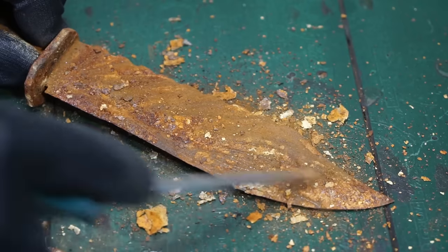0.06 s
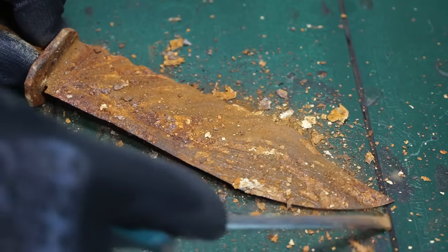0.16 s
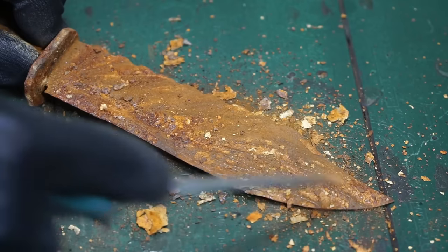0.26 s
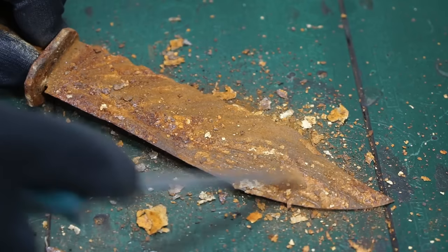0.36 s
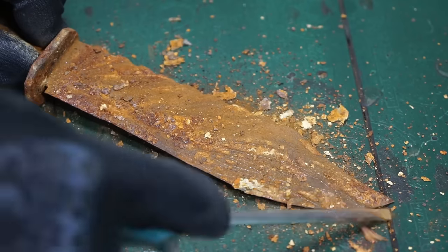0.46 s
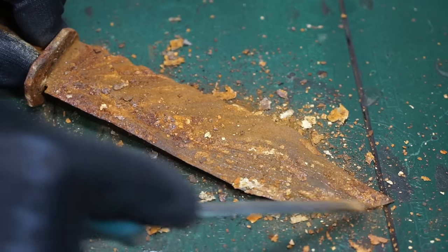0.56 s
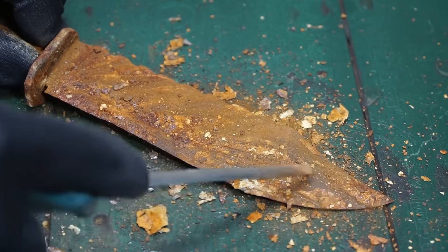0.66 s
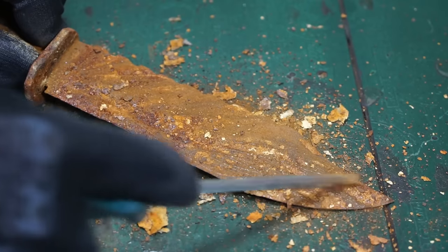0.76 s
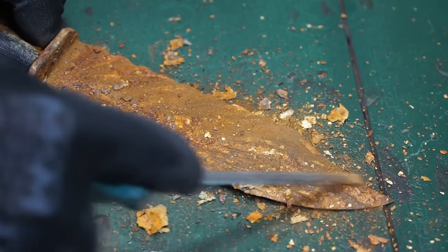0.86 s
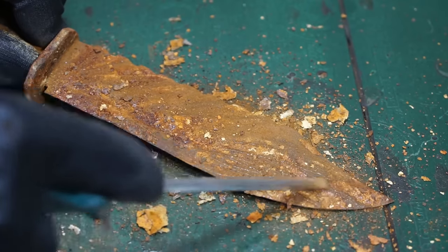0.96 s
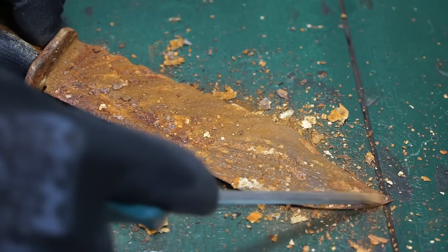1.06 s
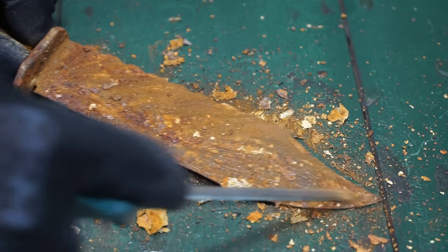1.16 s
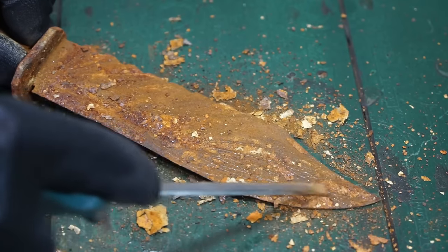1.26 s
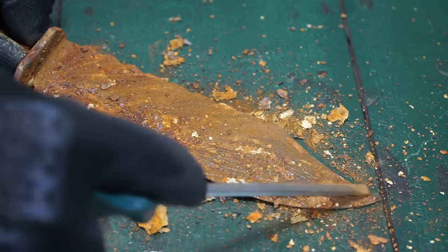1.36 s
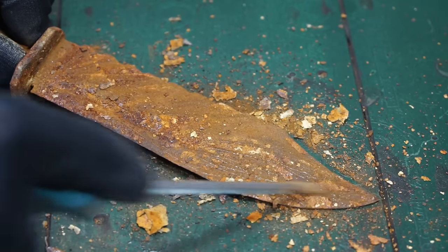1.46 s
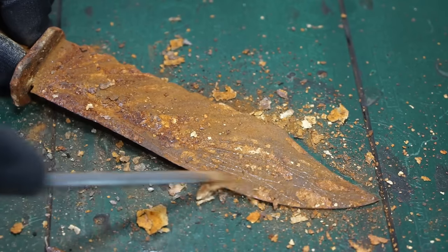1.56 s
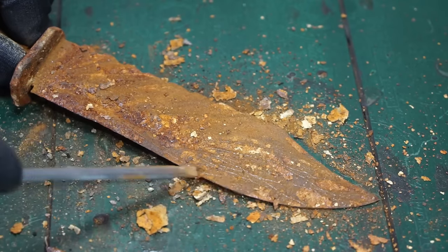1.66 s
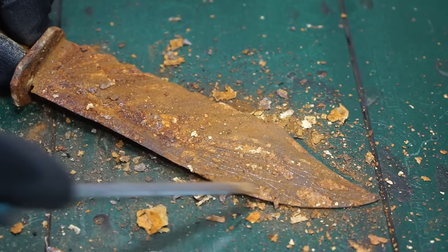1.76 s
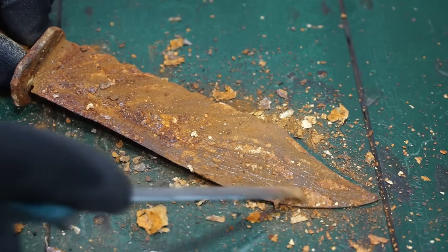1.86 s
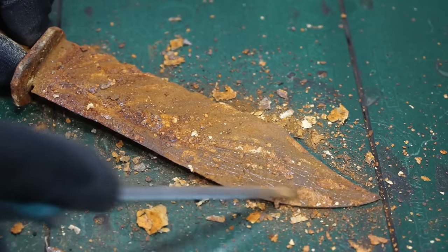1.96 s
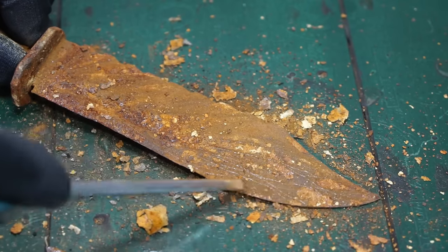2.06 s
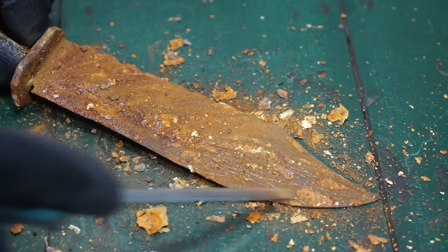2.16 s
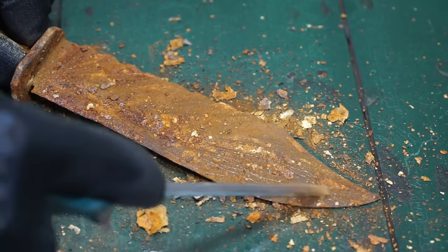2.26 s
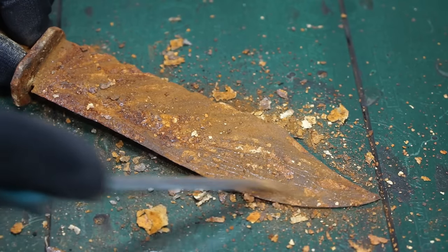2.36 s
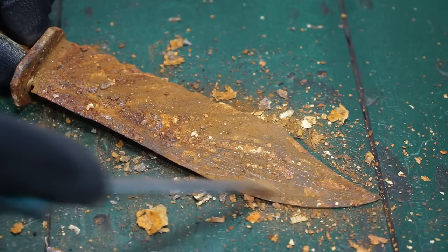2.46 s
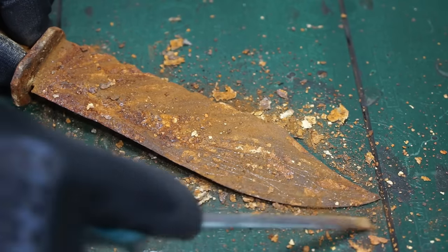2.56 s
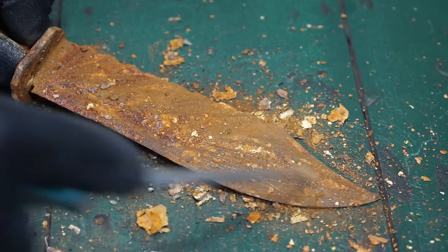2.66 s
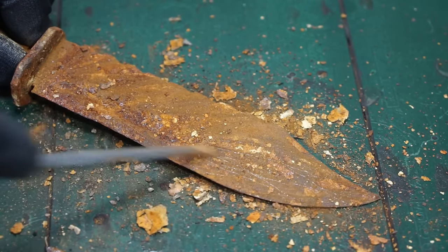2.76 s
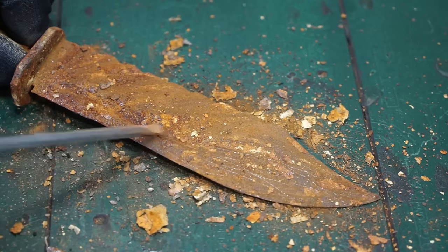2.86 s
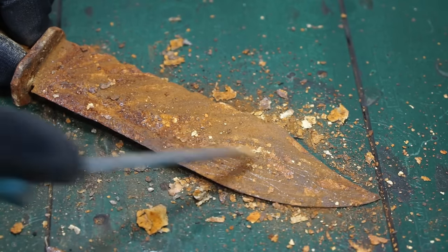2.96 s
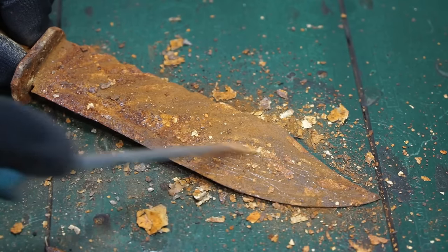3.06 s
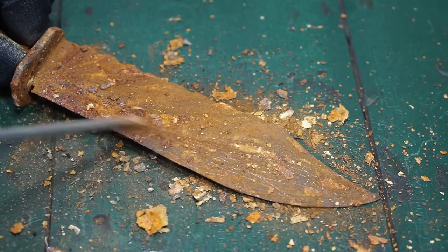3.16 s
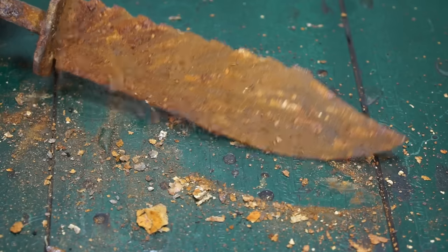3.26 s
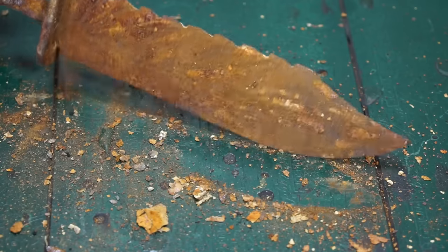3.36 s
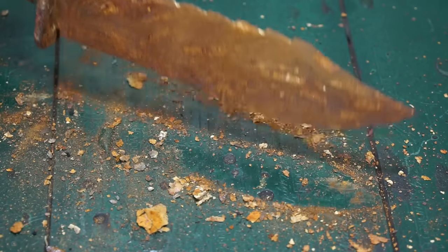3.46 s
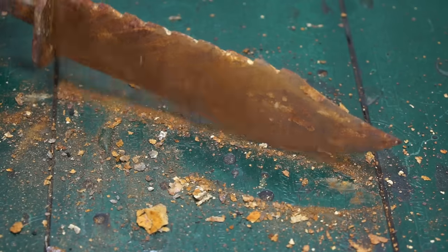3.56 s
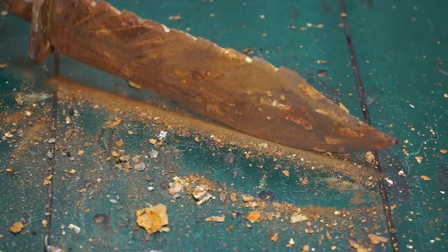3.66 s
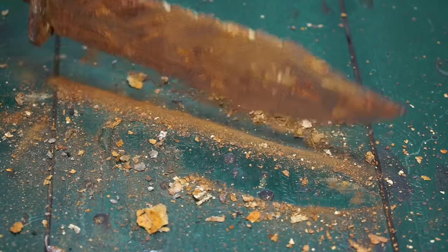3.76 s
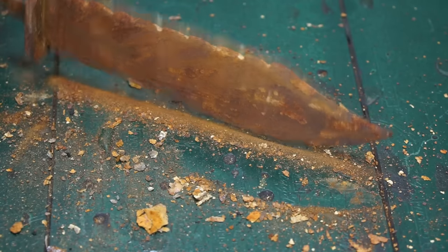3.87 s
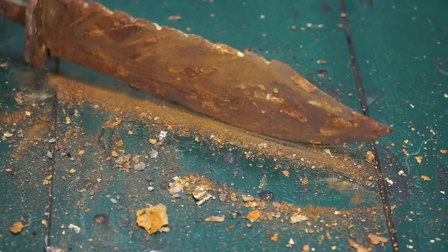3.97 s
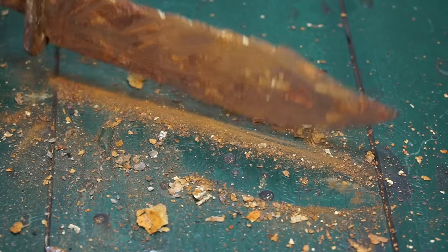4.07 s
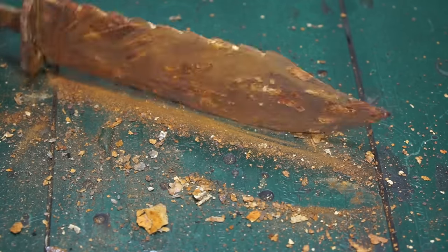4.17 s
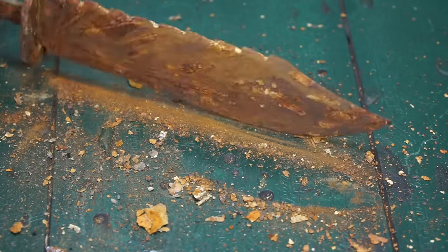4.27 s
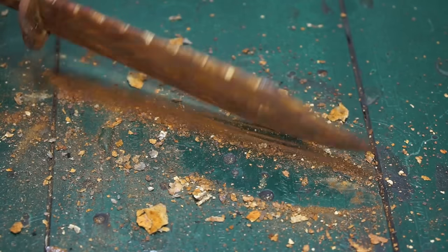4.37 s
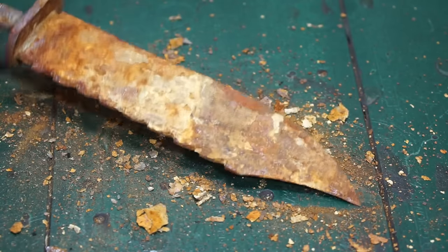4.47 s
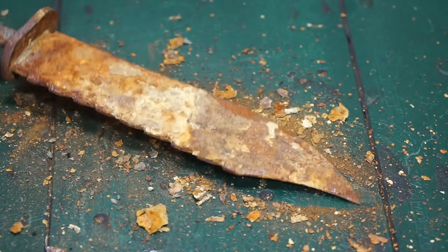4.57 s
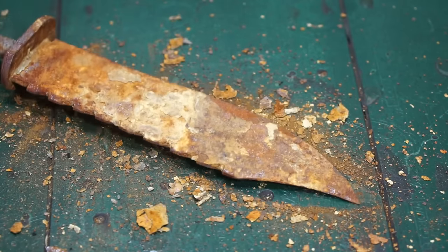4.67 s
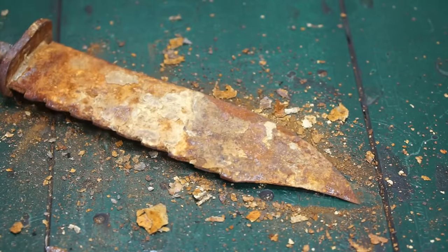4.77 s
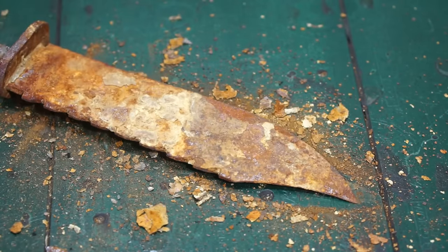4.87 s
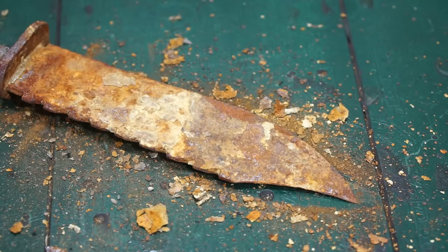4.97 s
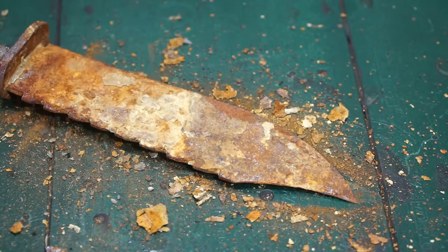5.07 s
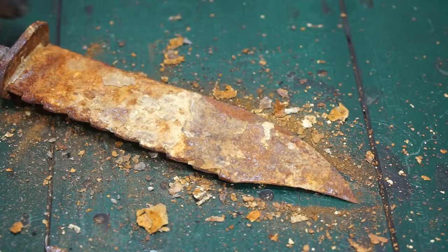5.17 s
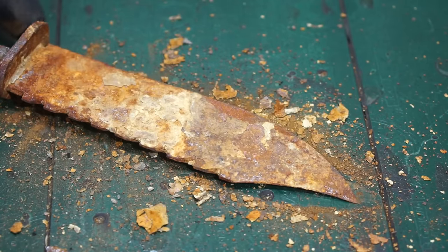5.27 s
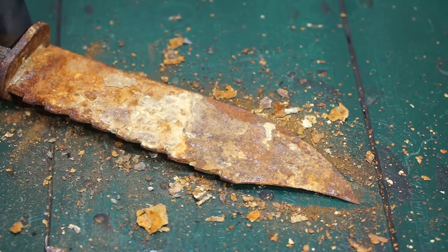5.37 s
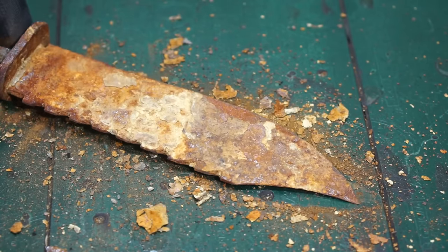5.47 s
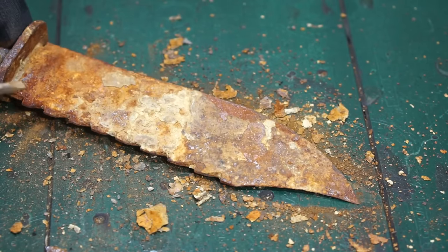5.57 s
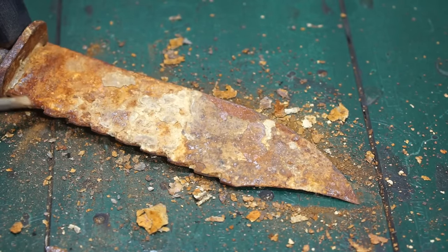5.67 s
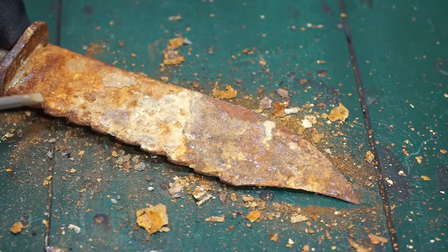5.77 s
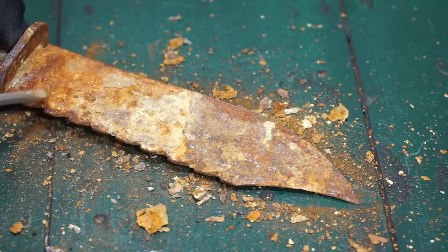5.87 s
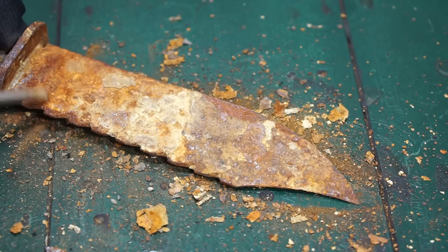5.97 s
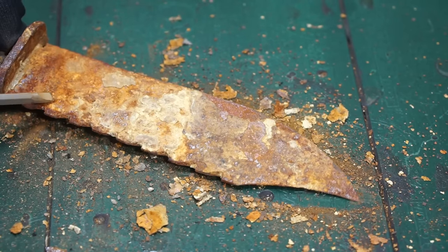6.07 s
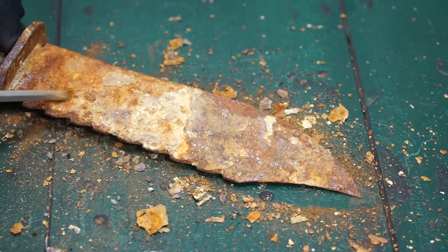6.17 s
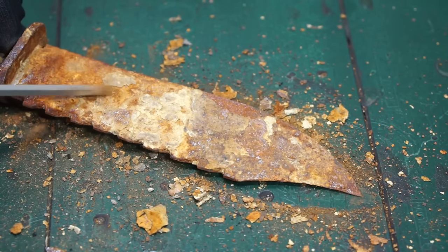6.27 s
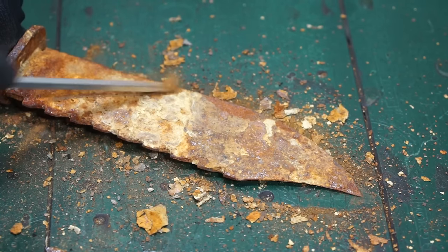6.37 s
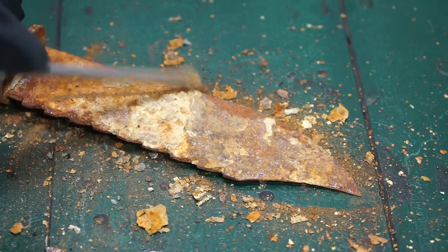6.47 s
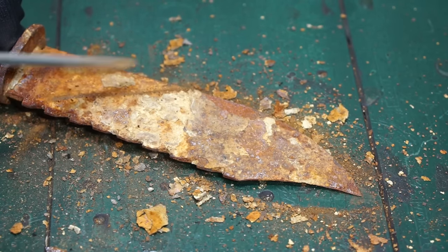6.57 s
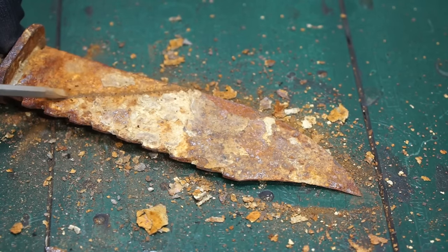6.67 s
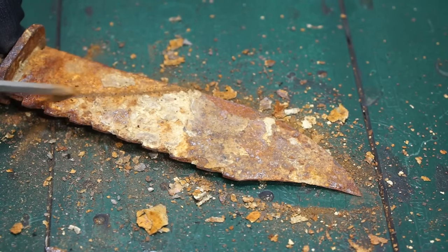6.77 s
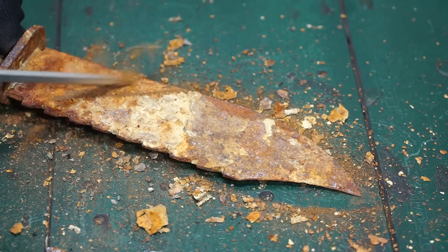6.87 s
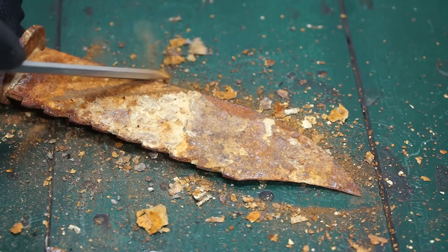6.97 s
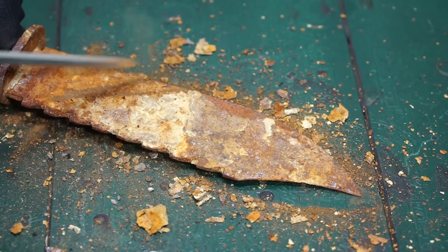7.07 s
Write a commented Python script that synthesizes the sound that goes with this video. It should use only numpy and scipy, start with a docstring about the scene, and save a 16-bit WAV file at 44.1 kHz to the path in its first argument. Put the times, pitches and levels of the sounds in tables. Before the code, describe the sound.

A thin steel tool scrapes rust off a knife in quick gritty strokes, then three hard bench knocks, a clatter, and duller scrapes in a small room.

```python
"""A thin steel tool scrapes flaking rust off a knife on a wooden workbench, in a small live room.
Strokes are dense random grains through resonances of tool, blade and bench; taps and squeals join them.
The knife is lifted, knocked three times on the bench (ringing modes and a noise boom), turned over and set
down with a clatter; glove and sleeve rustle as shaped noise, then two strokes scrape the other side.
The bench rocks under the work, the room adds echo and faint air, and a limiter holds the loudest moments down."""
import sys
import numpy as np
from scipy import signal
from scipy.fft import rfft, irfft, next_fast_len
from scipy.io import wavfile
from scipy.ndimage import uniform_filter1d, minimum_filter1d, map_coordinates

SR = 44100
rng = np.random.default_rng(int(sys.argv[2]) if len(sys.argv) > 2 else 0)


def bounce(signal):
    """Save signal as a 16-bit WAV file at the path given by the first command-line argument."""
    frames = np.transpose(np.atleast_2d(signal))
    limited = np.clip(frames, -1, 1)
    pcm = np.round(limited * 32767).astype(np.int16)
    wavfile.write(sys.argv[1], SR, pcm)


N = 314433
TURNED_S = 4.3  # from here on the knife lies with its other side up

# Resonances of tool, blade and bench with either side up.
# Each row: centre in Hz, width in Hz, relative level in dB.
FRONT_MODES = [(319, 100, -1.5), (532, 43, -7.5), (856, 21, -8), (1170, 210, -4), (1750, 24, -7.5),
               (1862, 50, 1), (2028, 61, -4), (2205, 23, 1), (2370, 14, 1.5), (2900, 71, -2),
               (3076, 54, -2), (3382, 23, -2.5), (3918, 26, -3.5), (4760, 47, -14), (6870, 180, -15),
               (8030, 230, -15), (9220, 160, -9), (11730, 500, -20.5)]
BACK_MODES = [(310, 55, -0.5), (340, 34, -11.5), (559, 15, -4.5), (830, 55, 1.5), (1120, 37, 2),
              (1524, 34, -8), (1940, 600, -11.5), (3150, 160, -14.5), (4385, 37, -11.5), (6790, 140, -7.5),
              (8970, 270, -11.5), (10720, 90, -22), (11380, 210, -17.5)]
# Colour of a dull thud on the bench. Each row: frequency in Hz, relative density in dB per Hz.
THUD_COLOUR = [(100, -54), (200, 3.5), (290, 11), (520, 0.5), (900, -3.5), (1500, -7), (3000, -30)]


def scrape(strokes, modes, rub, modes_db, judder_db, ripple_db, bite, face_db, gather_db=1.5):
    """Rust grains break under the tip in a dense stream and shake tool, blade and bench."""
    drop_db, flat = 24.5, 2.21  # how far the force sinks at a turn; how flat the top of a stroke is
    grain_rate, flake_rate = 12000, 45  # mean events per second
    flake_db = -1  # a snapping flake over a single grain
    catch_db = 1.2  # how far the force jumps as the tip catches on ridges of rust
    swell_db = 3  # how far each resonance swells and fades along a stroke
    grip_shift = 0.006  # share by which the grip detunes the tool's high ring from stroke to stroke
    note_width = 0.26  # width of the picked-out resonance, as a share of its pitch
    face_follows = 0.27  # share of the bench's shaking that the blade's face takes up
    out, n = np.zeros((2, N)), SR * 2 // 5
    grid = np.arange(0, SR / 2, 5)
    # countless weak modes between the strong ones
    ripple = amp(ripple_db * wander(len(grid), 6))
    for s, rise, fall, peak_db, bench, edge, grit, note_hz, note_db, ring_db in strokes:
        gate, arch_db = sweep(rise, fall, drop_db, flat, attack=0.0076, fade=0.0046, size=n)
        force_db = peak_db + arch_db + catch_db * wander(n, SR / 70)
        grains = rng.standard_normal((2, n)) * (rng.random(n) < grain_rate / SR)
        # now and then a whole flake snaps off
        snaps = np.convolve(rng.random(n) < flake_rate / SR, np.hanning(30), "same")
        grains = grains + amp(flake_db) * rng.standard_normal((2, n)) * snaps
        # the tip judders over pits and flakes
        grains = grains * amp(judder_db * wander(n, SR / 160))
        sound = filtered(grains, lambda f: amp(along(rub, f)) * np.interp(f, grid, ripple))
        # as the tip travels it crosses nodes and bellies, so each resonance swells and fades
        for centre, width, db in modes:
            of_tool = centre > 6000
            feed = amp(modes_db + db + ring_db * of_tool + swell_db * wander(n, SR / 22))
            pitch = centre * (1 + of_tool * grip_shift * rng.normal())
            sound = sound + filtered(grains * feed, lambda f: resonance(f, pitch, width))
        sound = patchy(sound, depth_db=2.3)
        # harder pressure mainly raises the rasp of the steel; bench and fine grit follow less
        slack = bite * (-24.0 - force_db)
        # loosened dust gathers under the tip, so the fine grit grows along the stroke
        dust_db = gather_db * np.tanh((np.arange(n) / SR - rise) / fall)
        # five bands upward: bench, blade face, blade edge, steel rasp, fine grit
        shares = [bench + slack, face_db + face_follows * bench, edge, 0, grit + slack + dust_db]
        below = [filtered(sound, lambda f: 1 / (1 + (f / top) ** 8))
                 for top in (215, 550, 1400, 2500, 5500)]
        below.append(sound)
        bands = [amp(force_db + db) * unit(hi - lo) for db, lo, hi in zip(shares, below, below[1:])]
        # where the tip bears down decides which resonance stands out
        note = filtered(rng.standard_normal((2, n)),
                        lambda f: resonance(f, note_hz, note_width * note_hz) ** 2)
        add(out, s, gate * (sum(bands) + amp(force_db + note_db) * unit(note)))
    return out


def sweep(rise, fall, drop_db, flat, attack, fade, size):
    """A gate, and the arch (dB) of a hand that speeds up and slows down; with a short rise it lands moving."""
    t = np.arange(size) / SR
    span = np.where(t < rise, max(rise, fall), fall)
    gate = (1 - np.exp(-t / attack)) * np.exp(-np.maximum(t - rise - fall, 0) / fade)
    return gate, -drop_db * np.minimum(abs(t - rise) / span, 1) ** flat


def patchy(x, depth_db):
    """Rough and smooth patches shift the colour every few hundredths of a second."""
    z = signal.stft(x, nperseg=256)[2]
    field = rng.standard_normal(z.shape[1:])
    field = uniform_filter1d(field, size=5, axis=0)  # smooth over frequency
    field = uniform_filter1d(field, size=10, axis=1)  # smooth over time
    return signal.istft(z * amp(depth_db * unit(field)), nperseg=256)[1][:, :x.shape[1]]


def chirps(rows, spread):
    """Stick and slip: brief noise bands that swell, glide and fade; spread is their width over their pitch."""
    out = np.zeros((2, N))
    t = np.arange(SR // 2) / SR
    t = t - t.mean()
    for s, db, half, hz, glide in rows:
        band = filtered(rng.standard_normal((2, len(t))), lambda f: resonance(f, hz, spread * hz) ** 2)
        # reading the band faster or slower glides its pitch
        position = np.cumsum(2 ** (glide * t))
        bent = np.array([map_coordinates(side, [position], mode="mirror") for side in unit(band)])
        add(out, s + t[0], bent * amp(db) * np.exp(-(t / half) ** 2))
    return out


def taps(thud_db):
    """The tool touches down or bumps over an edge of the blade, which is pressed flat on the bench."""
    # Each row: start in seconds, level in dB, extra thud level in dB.
    touchdowns = [(0.0226, -21, -2), (0.364, -21, -1.5), (0.45, -30.5, 5), (0.687, -38.5, 9.5),
                  (1.6712, -37.5, 8), (1.8765, -21.5, -10), (2.082, -32.5, 5), (2.455, -17, -1),
                  (2.7279, -22, 0.5), (2.991, -23.5, -0.5), (3.278, -27.5, -7.5), (5.977, -29, -10),
                  (6.357, -25.5, 9), (6.387, -31, 13.5), (6.661, -30, -3.5), (6.9061, -28.5, 2.5)]
    out = np.zeros((2, N))
    for s, db, low_db in touchdowns:
        modes = FRONT_MODES if s < TURNED_S else BACK_MODES
        hit = touch(modes, steel_db=-12.5, crack_db=-13.0, thud_db=thud_db + low_db, body_db=-1.5,
                    steel_t60=0.14, crack_t60=0.098, thud_t60=0.08)
        add(out, s, amp(db) * hit)
    return out


def touch(modes, steel_db, crack_db, thud_db, body_db, steel_t60, crack_t60, thud_t60):
    """A touch gives a crack, a short ring of the steel, and a thud of the bench with its low resonances."""
    t = np.arange(SR // 3) / SR

    def ring(f):
        return sum(amp(level) * np.sqrt(c) * resonance(f, c, w) for c, w, level in modes if c > 1400)

    def low(f):
        return sum(amp(level) * resonance(f, c, w) for c, w, level in modes if c < 1000)

    steel = unit(filtered(rng.standard_normal((2, len(t))), ring)) * amp(steel_db - 60 * t / steel_t60)
    crack_colour = [(1500, 6.5), (4000, 11.5), (15000, -0.5)]  # (Hz, dB per Hz)
    crack = noise(crack_colour, len(t)) * amp(crack_db - 60 * t / crack_t60)
    body = amp(body_db) * unit(filtered(rng.standard_normal((2, len(t))), low))
    thud = (noise(THUD_COLOUR, len(t)) + body) * amp(thud_db - 60 * t / thud_t60)
    return (steel + crack + thud) * (1 - np.exp(-t / .001))


def knocks(ring_db, ring_t60, thump_db, build_db, build_s, damp_t60, dust_db, dust_t60):
    """Hard blows of the handle on one spot set the bench ringing, fill the room and shake rust dust loose."""
    # The handle hits the bench. Each row: start in seconds, level in dB.
    blows = [(3.554, -11), (3.867, -10), (4.140, -11)]
    # What the bench rings with. Each row: pitch in Hz, relative level in dB.
    bench_modes = [(234, -8), (308, -2), (550, 0.5), (582, -11), (759, -0.5), (1164, -4.5)]
    # Colour of boom and thump. Each row: frequency in Hz, relative density in dB per Hz.
    knock_colour = [(71, -47), (120, -23), (250, -29.5), (310, 2.5), (404, -12), (534, -3), (630, -8.5),
                    (790, -3.5), (1260, -10.5), (3470, -20.5), (14000, -66)]
    dust_colour = [(4000, -12.5), (8000, 1.5), (12000, 3.5), (15000, -11.0)]  # (Hz, dB per Hz)
    out, spot = np.zeros((2, N)), diffuse()
    t = np.arange(spot.shape[1]) / SR
    for s, db in blows:
        # mostly the same tail each time, since the spot is the same
        boom = filtered(spot + 0.39 * diffuse(), lambda hz: amp(along(knock_colour, hz)))
        boom = boom / np.std(boom[:, :SR // 20]) * amp(-60 * t / damp_t60)
        ring = sum(amp(level + rng.normal(0, 1.0)) * np.sin(2 * np.pi * (hz * t + rng.random()))
                   for hz, level in bench_modes)
        # the reflections take a moment to pile up
        build = amp(-build_db * np.exp(-t / build_s))
        body = (boom + amp(ring_db - 60 * t / ring_t60) * ring) * build
        thump = noise(knock_colour, len(t)) * amp(thump_db - 60 * t / 0.041)
        flicker_db = 2.4 * wander(len(t), SR / 200)
        dust = noise(dust_colour, len(t)) * amp(dust_db - 60 * t / dust_t60 + flicker_db)
        add(out, s, amp(db) * (body + thump + dust) * (1 - np.exp(-t / 0.00053)))
    # the blows carry nothing below about 170 Hz
    return signal.sosfilt(signal.butter(3, 170, "highpass", fs=SR, output="sos"), out)


def clatter(steel_db, tick_t60, grit_db, grit_t60, thud_t60, ring_t60, bounce_db):
    """The knife meets the bare bench with a tick and a crunch of crumbs; held loosely, it chatters and buzzes."""
    # The knife rocks as it is lifted and set down.
    # Each row: start in seconds, tick level in dB, level of the blade's low ring in dB, thud level in dB.
    contacts = [(3.296, -60, -44.5, -44), (4.4044, -37.5, -65, -42), (4.438, -29.5, -39.5, -49.5),
                (4.4464, -25, -31.5, -36.5), (4.4927, -36, -32, -39.5), (4.5003, -48, -31, -52.5),
                (4.533, -37.5, -46.5, -59.5), (4.5519, -34, -43.5, -56), (4.5796, -33, -45, -57.5),
                (4.6077, -31, -47.5, -59.5)]
    # Ring of the loosely held knife. Each row: pitch in Hz, relative level in dB.
    loose_modes = [(470, -1), (528, -2), (985, -14.5), (1780, -11.5), (1970, -9), (2860, -3), (3930, -3),
                   (4355, -6), (6340, -7), (6870, -2.5), (8420, -7), (9235, -6), (11660, -3.5),
                   (12400, -12)]
    tick_colour = [(7000, -9), (12000, -7.0), (15000, -6.0)]  # (Hz, dB per Hz)
    out, t = np.zeros((2, N)), np.arange(SR // 3) / SR
    for s, tick_db, flex_db, thud_db in contacts:
        snap = amp(tick_db - 60 * t / tick_t60)
        crunch = amp(tick_db + grit_db - 60 * t / grit_t60)
        tick = noise(tick_colour, len(t)) * (snap + crunch)
        hit = tick + noise(THUD_COLOUR, len(t)) * amp(thud_db - 60 * t / thud_t60)
        for hz, level in loose_modes:
            if hz < 1000:
                drive_db = flex_db
            else:
                drive_db = tick_db + steel_db + 3 * (rng.normal() + wander(len(t), SR / 250))
            # each contact pins the blade a little differently
            hz = hz * (1 + .006 * rng.normal())
            tone = np.sin(2 * np.pi * (hz * t + rng.random((2, 1))))
            hit = hit + amp(drive_db + level - 60 * t / ring_t60) * tone * (1 - np.exp(-t / 0.0016))
        add(out, s, hit)
        # two fainter bounces follow
        for delay in rng.uniform(0, .02, 2):
            add(out, s + delay, amp(bounce_db) * tick)
    return out


def sleeve(drop_db, crinkle_db):
    """Glove and sleeve slide as the hands move the knife: cloth noise with a crinkling level."""
    # Each row: start in seconds, rise in seconds, fall in seconds, level in dB.
    rustles = [(3.26, 0.029, 0.35, -44), (4.311, 0.14, 0.45, -50), (4.819, 0.16, 0.1, -50.5),
               (5.155, 0.18, 0.29, -46), (5.284, 0.029, 0.039, -34), (5.43, 0.076, 0.38, -46),
               (5.716, 0.039, 0.48, -47.5)]
    # Colour of the cloth. Each row: frequency in Hz, relative density in dB per Hz.
    cloth_colour = [(59, -74.5), (100, -20), (223, -4), (348, -1), (1040, -10.5), (1430, -2.5), (2430, 2),
                    (15600, -3.5)]
    out, n = np.zeros((2, N)), SR * 3 // 4
    for s, rise, fall, db in rustles:
        gate, arch_db = sweep(rise, fall, drop_db, flat=0.53, attack=0.023, fade=.03, size=n)
        crinkle = crinkle_db * (wander(n, SR / 120) + wander(n, SR / 18))  # fine and slow
        cloth = patchy(noise(cloth_colour, n), depth_db=3.0)
        add(out, s, gate * amp(db + arch_db + crinkle) * cloth)
    return out


def background(work, sway_db, air_db, linger, follow):
    """The bench rocks after every push, as low noise that follows the work, and the room adds faint air."""
    # The rocking bench, then the room's air. Each row: frequency in Hz, relative density in dB per Hz.
    sway_colour = [(20, -21), (62, -9), (74, 0.5), (88, -24), (160, -15), (400, -57)]
    air_colour = [(30, -15.5), (150, -6.5), (400, -14)]
    keep = np.exp(-1 / (linger * SR))
    power = filtered(work[0], lambda hz: hz < 600) ** 2
    push = np.sqrt(signal.lfilter([1 - keep], [1, -keep], power))
    # hard pushes rock it only a little more
    push = push.max() * (push / push.max()) ** follow
    return amp(sway_db) * push * noise(sway_colour, N) + amp(air_db) * noise(air_colour, N)


def diffuse():
    """A pair of room tails, scaled to energy 1 in the first, whose treble dies first."""
    # Decay of the room. Each row: frequency in Hz, time to fall by 60 dB in seconds.
    room_decay = [(300, 0.42), (6000, 0.33)]
    hz, t, z = signal.stft(rng.standard_normal((2, SR * 3 // 4)), SR, nperseg=256)
    decay = amp(-60 * t / along(room_decay, hz)[:, None])
    tail = signal.istft(z * decay, SR, nperseg=256)[1]
    return tail / np.linalg.norm(tail[0])


def ports(pair, left_db):
    """Middle and side to left and right: the bass is shared, the treble is wide and leans left."""
    # Each row: frequency in Hz, left-right likeness from 0 to 1.
    likeness = [(280, 0.99), (640, 0.92), (1400, 0.63), (3100, 0.43), (15000, 0.089)]
    # Each row: frequency in Hz, left minus right in dB, before left_db is added.
    leaning = [(380, -0.5), (700, 0.5), (8000, 1), (15000, 5)]

    def spread(hz):
        turn = np.arccos(np.clip(along(likeness, hz), -1, 1)) / 2
        return np.array([np.cos(turn), np.sin(turn)])

    mid, side = filtered(pair, spread)
    return filtered(np.array([mid + side, mid - side]),
                    lambda hz: amp(np.outer([.5, -.5], along(leaning, hz) + left_db)))


def amp(db):
    """Decibels to gain."""
    return 10 ** (np.asarray(db) / 20)


def unit(x):
    """Scale to rms 1."""
    return x / np.sqrt(np.mean(x ** 2) + 1e-20)


def along(points, hz):
    """(Hz, value) points read on a log axis."""
    f, v = np.transpose(points)
    return np.interp(np.log(hz + 1), np.log(f + 1), v)


def filtered(x, response):
    """x times a response of frequency."""
    n = x.shape[-1]
    m = next_fast_len(n + SR // 10)
    return irfft(rfft(x, m) * response(np.fft.rfftfreq(m, 1 / SR)), m)[..., :n]


def resonance(hz, centre, width):
    """Response of one damped mode."""
    return 1j * hz * width / (centre ** 2 - hz ** 2 + 1j * hz * width)


def noise(colour, size):
    """Two unrelated noises (middle, side) of joint rms 1."""
    return unit(filtered(rng.standard_normal((2, size)), lambda hz: amp(along(colour, hz))))


def wander(size, step):
    """A smooth random curve with a knot every step points."""
    return map_coordinates(rng.standard_normal(int(size / step) + 4), [np.arange(size) / step])


def add(track, s, sound):
    """Mix a sound into the track at time s."""
    part = track[:, max(round(s * SR), 0):][:, :sound.shape[1]]
    part += sound[:, :part.shape[1]]


def scene():
    """Work on the bench, the room's answer and the hands at the left."""
    # Strokes of the tip. Each row: start in seconds, rise in seconds, fall in seconds, force in dB,
    # then relative levels in dB of shaken bench, blade edge and fine grit, the resonance that this spot
    # of the blade picks out in Hz and its level in dB, and the level of the tool's high ring in dB.
    strokes = [(0.005, 0.07, 0.066, -20.5, -7, -0.5, -4, 2270, -6.5, 6),
               (0.366, 0.043, 0.024, -17, -7, -3.5, -6.5, 1840, -0.5, -2),
               (0.688, 0.036, 0.091, -32, -6.5, -2.5, -4.5, 2130, -15, 13),
               (0.837, 0.053, 0.09, -38.5, -11, -2, -2.5, 3040, -2, 9.5),
               (0.958, 0.07, 0.061, -27, -4, 0.5, -1.5, 2060, -4, -1),
               (1.095, 0.075, 0.094, -32.5, -14, -5.5, 1.5, 1930, -6, 4.5),
               (1.249, 0.064, 0.081, -30.5, -3.5, -2, -2.5, 343, 0, -4),
               (1.385, 0.12, 0.16, -28, -11.5, -7.5, -1, 1950, -3.5, 8.5),
               (1.924, 0.07, 0.098, -38, -7, 3.5, 5, 322, -1, 3),
               (2.08, 0.1, 0.092, -30.5, 0.5, 6, 2.5, 356, -0.5, 7.5),
               (2.274, 0.084, 0.081, -31.5, -10.5, -23, 1, 1980, 3.5, -0.5),
               (2.44, 0.048, 0.083, -25, -13, -6.5, -5.5, 1870, 0.5, 15),
               (2.728, 0.045, 0.11, -34, -13, -8.5, -2, 896, -3, 5),
               (3.017, 0.12, 0.07, -28.5, -9.5, -10.5, 1.5, 2380, -8, -3.5),
               (6.085, 0.021, 0.037, -51.5, 9, -10, 2, 2520, 6, -3.5),
               (6.136, 0.043, 0.08, -42, -2, -6.5, -0.5, 517, -6.5, 6),
               (6.14, 0.21, 0.12, -34.5, 0, -5.5, 0, 930, 1.5, -2),
               (6.705, 0.17, 0.096, -33.5, 2, -6, 1, 300, -5, -2.5)]
    # Friction between the resonances, either side up.
    # Each row: frequency in Hz, relative density in dB per Hz.
    front_rub = [(76, -34), (130, 0), (351, -14), (492, -10.5), (875, 10.5), (1440, -9), (1830, -1.5),
                 (9310, -17.5), (15000, -17.5)]
    back_rub = [(100, -53), (305, -40), (412, -9.5), (825, 0.5), (1690, -17.5), (6010, -22.5), (15000, -23)]
    # The tip catches and squeals; then glove and sleeve rub as the grip shifts.
    # Each row: centre in seconds, level in dB, half length in seconds, pitch in Hz, glide in octaves per second.
    squeals = [(1.022, -24.5, 0.0074, 2200, -2), (1.04, -33.5, 0.021, 9800, 9.5),
               (1.335, -38.5, 0.027, 10300, 4.5), (2.508, -24, 0.008, 9310, 2), (5.994, -40, 0.011, 688, 1)]
    grip_rubs = [(4.93, -67.5, 0.05, 414, 2), (5.42, -63, 0.023, 355, 0), (5.6, -63.5, 0.077, 327, 0.3)]

    front = [row for row in strokes if row[0] < TURNED_S]
    back = [row for row in strokes if row[0] > TURNED_S]
    work = amp(-1.5) * scrape(front, FRONT_MODES, front_rub, modes_db=1.5, judder_db=0.8,
                              ripple_db=3.5, bite=0.089, face_db=-0.97)
    turned = scrape(back, BACK_MODES, back_rub, modes_db=-3.0, judder_db=0.4,
                    ripple_db=3.0, bite=0.19, face_db=1.5)
    work = work + turned + chirps(squeals, spread=0.12) + taps(thud_db=-6)
    work = work + clatter(steel_db=-12, tick_t60=0.002, grit_db=-7.5, grit_t60=0.067,
                          thud_t60=0.14, ring_t60=0.09, bounce_db=-15)
    wet = [(300, -2.5), (2500, -8.0), (6000, -8.5), (14000, -16.0)]  # (Hz, dB)
    echo = signal.fftconvolve(work, diffuse(), axes=1)[:, :N]
    echo = filtered(echo, lambda hz: amp(along(wet, hz)))
    blows = knocks(ring_db=-6, ring_t60=0.37, thump_db=-6.5, build_db=17.0, build_s=0.062,
                   damp_t60=8.2, dust_db=-41.5, dust_t60=0.2)
    # strokes near the handle, on the turned side, rock the bench more
    floor = background(work + 1.4 * turned + 0.76 * blows, sway_db=-18.0, air_db=-66.0,
                       linger=0.047, follow=0.87)
    hands = sleeve(drop_db=15.5, crinkle_db=1.5)
    hands = hands + chirps(grip_rubs, spread=0.43) + chirps(grip_rubs, spread=0.32)
    return ports(amp(0.5) * work + echo + blows + floor, left_db=0.5) + ports(hands, left_db=4.5)


def record(dry):
    """A fast limiter flattens the loudest blows; nothing is kept above the band limit."""
    ceiling_db, top_hz = -9.5, 15800
    needed = np.minimum(1, amp(ceiling_db) / (np.abs(dry).max(axis=0) + 1e-9))
    gain = uniform_filter1d(minimum_filter1d(needed, size=400), size=200)
    return filtered(dry * gain, lambda hz: hz < top_hz)


dry = scene()
out = record(dry)
bounce(out)
```